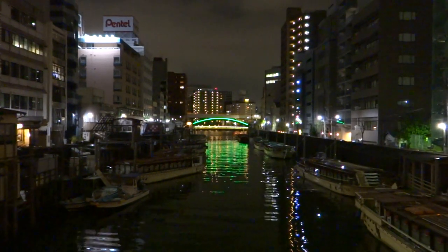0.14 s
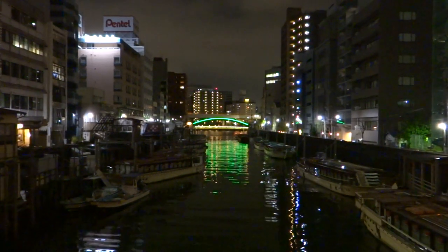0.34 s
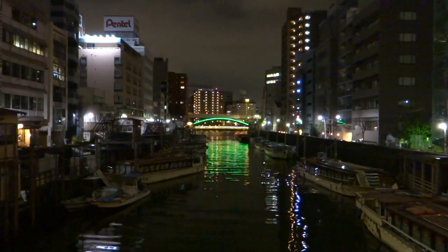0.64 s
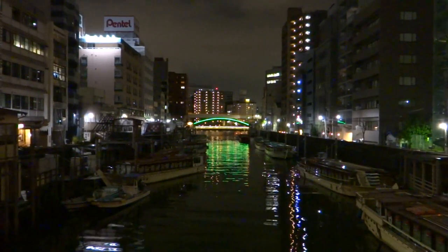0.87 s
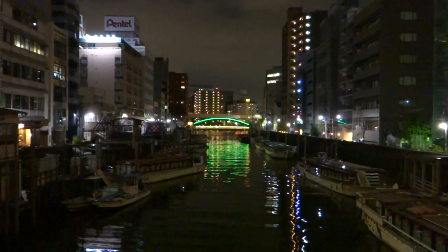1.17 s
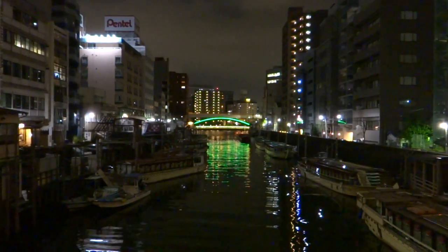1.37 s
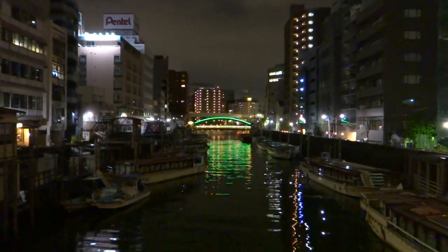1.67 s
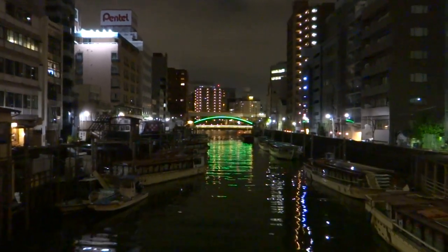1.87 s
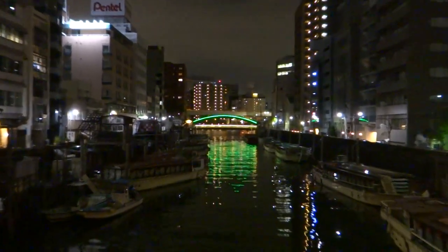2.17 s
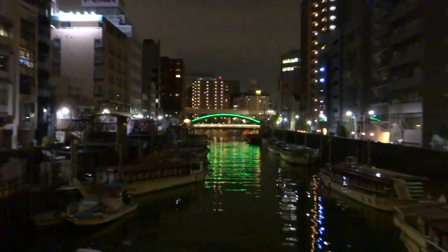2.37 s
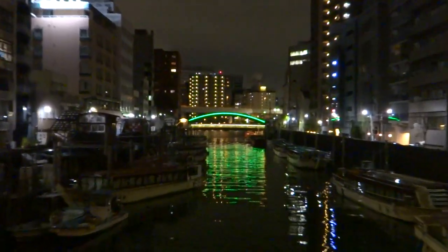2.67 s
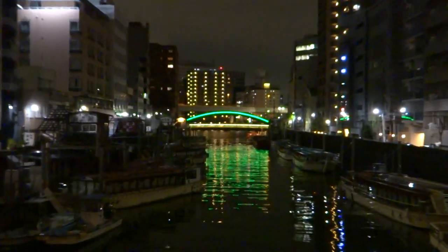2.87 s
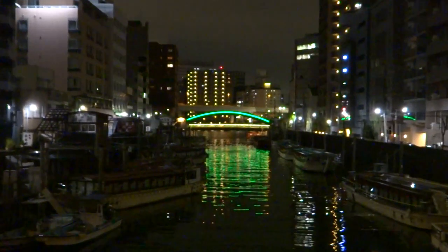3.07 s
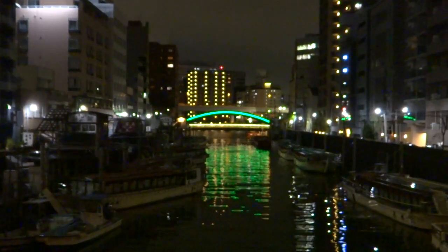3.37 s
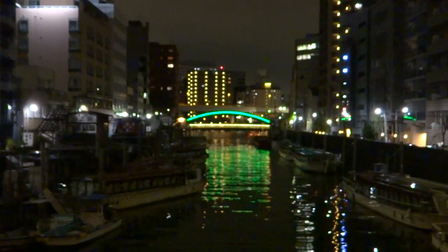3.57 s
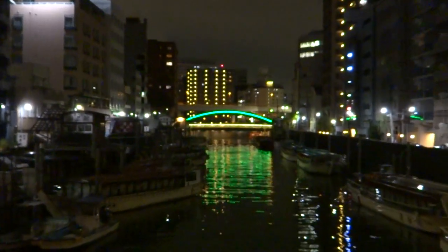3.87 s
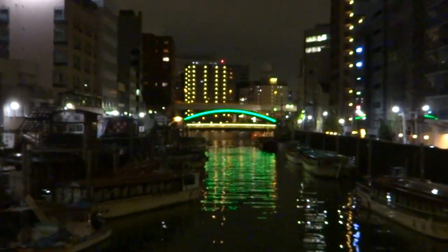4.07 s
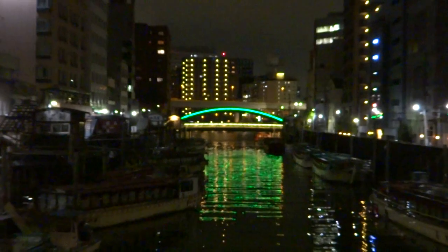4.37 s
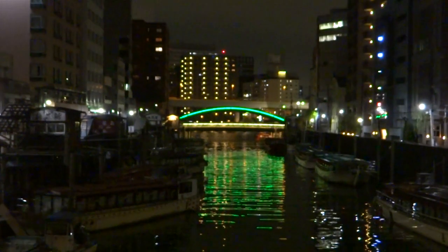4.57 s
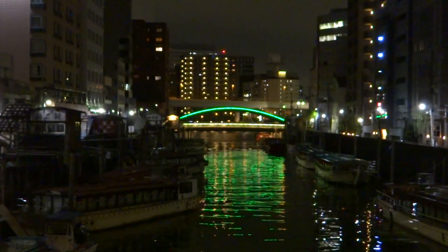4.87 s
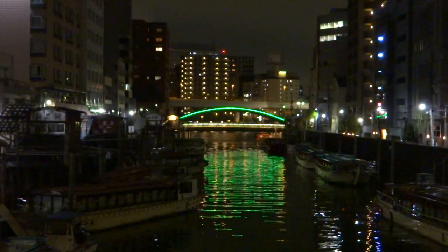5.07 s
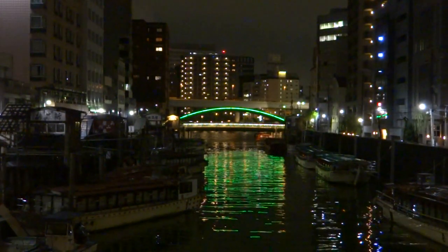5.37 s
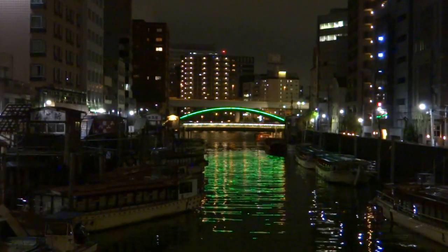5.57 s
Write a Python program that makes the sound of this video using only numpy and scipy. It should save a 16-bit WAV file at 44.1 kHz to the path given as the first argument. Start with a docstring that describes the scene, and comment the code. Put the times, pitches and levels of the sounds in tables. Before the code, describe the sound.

A steady distant traffic wash fills the open air, with a very faint high electrical whine. A heavy vehicle pulls away on the right, its deep engine note rising, sagging and rising again higher. One tiny tick sounds nearby at the microphone. Rough gas roar and tyre noise swell, and the boom eases as the tyres stay loud.

```python
"""Night traffic on a city bridge

A heavy engine idles, revs up, eases off for a gear change and pulls away close on the right. Its exhaust booms
as a sum of firing orders; noise pulsed by the firings makes gas roar and clatter with tyres. Wheel thuds are
decaying low sines, and one nearby tick is a short burst of ringing modes. Behind lie far traffic as two bands
of ebbing noise, a faint whine of wavering sines and a very high hiss."""
import sys
import numpy as np
from scipy import signal
from scipy.fft import rfft, irfft
from scipy.io import wavfile
from scipy.ndimage import uniform_filter1d

SR = 44100
rng = np.random.default_rng(int(sys.argv[2]) if len(sys.argv) > 2 else 0)


def persist_wave(psi):
    """Save psi, clipped to +-1, as 16-bit WAV."""
    counts = np.round(np.clip(psi, -1, 1) * 32767).astype(np.int16)
    wavfile.write(sys.argv[1], SR, np.atleast_2d(counts).T)


N = 252252
TIME = np.arange(N) / SR  # s


def from_db(db):
    """Decibels to gain."""
    return 10 ** (np.asarray(db) / 20)


def unit(x):
    """Scales to an rms of one."""
    return x / np.sqrt(np.mean(x ** 2) + 1e-20)


def follow(rows):
    """The columns of a curve table at every sample, without the time column."""
    seconds, *columns = np.transpose(rows)
    return [np.interp(TIME, seconds, column) for column in columns]


def at_hz(points, hz):
    """Reads a spectrum on a log-frequency axis."""
    f, value = np.transpose(points)
    return np.interp(np.log(hz + 1), np.log(f + 1), value)


def drift(top_hz):
    """A slow random wander of rms one: white noise under a Gaussian low-pass."""
    hz = np.fft.rfftfreq(N, 1 / SR)
    spectrum = rfft(rng.standard_normal(N)) * np.exp(-(hz / top_hz) ** 2)
    return unit(irfft(spectrum, N))


def noise(spectrum, likeness, patchy_db):
    """Partly alike stereo noise of a given colour and rms one, with patches that come and go."""
    size, hop = 4096, 1024  # samples
    hz = np.fft.rfftfreq(size, 1 / SR)
    a, b, c, d, patches = rng.standard_normal((5, N // hop + 5, len(hz)))
    # smoothing over time, then over frequency, turns grains into patches
    patches = uniform_filter1d(patches, size=4, axis=0)
    patches = unit(uniform_filter1d(patches, size=40, axis=1))
    same = np.clip(at_hz(likeness, hz), -1, 1)
    left = a + 1j * b
    right = same * left + np.sqrt(1 - same ** 2) * (c + 1j * d)
    frames = np.array([left, right]) * from_db(at_hz(spectrum, hz) + patchy_db * patches)
    sound = signal.istft(frames.swapaxes(1, 2), nperseg=size, noverlap=size - hop)[1]
    return unit(sound[:, :N])


def placed(x, balance_db):
    """Tilts a sound between left and right, keeping the mean of the two gains at one."""
    gains = from_db(np.array([balance_db, -balance_db]) / 2)
    return x * gains / gains.mean(0)


# colour of the far rumble: (frequency [Hz], relative density [dB per Hz])
RUMBLE_COLOUR = [(12, -22), (25, -12), (45, -4), (80, 1), (170, 3.5), (230, -4.5), (370, -6), (520, -10),
                 (900, -17.5), (1200, -54)]
# colour of the far tyre hiss: (frequency [Hz], relative density [dB per Hz])
HISS_COLOUR = [(410, -25), (700, -6.5), (798, -1.5), (886, -5.5), (997, -1.5), (1770, -10), (2080, -6),
               (2920, -14.5), (3160, -13.5), (6070, -21.5), (6740, -21.5), (9350, -23.5), (11200, -30),
               (12300, -35), (16000, -46)]
# how the distant traffic ebbs: (time [s], level change [dB])
TRAFFIC_EBB = [(0, 2.5), (.8, 4), (1.5, 2), (2.2, 2), (2.9, 1), (4, 1), (5.72, -0.5)]
# how alike the distance sounds at left and right: (frequency [Hz], coherence [0 to 1])
CITY_LIKENESS = [(60, 1.0), (130, 1.0), (290, 0.99), (640, 0.92), (1410, 0.68), (3100, 0.9), (6820, 0.91),
                 (15000, 0.94)]


def city():
    """Far traffic: a low rumble and a smooth tyre hiss that ebb together."""
    ebb_db, = follow(TRAFFIC_EBB)
    rumble = from_db(-36) * noise(RUMBLE_COLOUR, CITY_LIKENESS, patchy_db=0.0)
    hiss_db = -45.5 + 0.35 * drift(27)
    hiss = from_db(hiss_db) * noise(HISS_COLOUR, CITY_LIKENESS, patchy_db=0.65)
    hiss = hiss * from_db([[-.4], [.4]])  # a touch more on the right
    return from_db(ebb_db) * (rumble + hiss)


# a thin electrical whine: (frequency [Hz], mean level [dB])
WHINE_TONES = [(5222, -74), (6476, -80), (6961, -76), (9862, -86), (11601, -82)]


def whine(waver_hz, flicker_db):
    """Faint high electrical tones, each a sine that wavers in pitch and level."""
    out = np.zeros(N)
    for hz, db in WHINE_TONES:
        level = from_db(db + flicker_db * drift(3))
        cycles = np.cumsum(hz + waver_hz * drift(12)) / SR
        out += level * np.sin(2 * np.pi * cycles)
    return out


# colour of the very high sizzle: (frequency [Hz], relative density [dB per Hz])
SIZZLE_COLOUR = [(11000, -41), (13000, -7), (14000, -1), (15000, 4), (16000, -13)]
# how strong the sizzle is: (time [s], level [dB])
SIZZLE_STRENGTH = [(0, -95), (3.8, -87), (4.1, -72), (4.55, -66), (4.9, -72), (5.72, -69)]


def sizzle():
    """A thin hiss at the very top: one band of noise, alike on both sides."""
    level_db, = follow(SIZZLE_STRENGTH)
    return from_db(level_db) * noise(SIZZLE_COLOUR, CITY_LIKENESS, patchy_db=-1.0)[0]


# one faint tick nearby: (time [s], strike level [dB])
TICK_STRIKES = [(2.817, -30)]
# what it rings with: (frequency [Hz], relative level [dB], time to fall 60 dB [s])
TICK_RING = [(2830, -5, .016), (4980, -4, .01), (5400, -1, .011), (13900, -15, .01)]


def ticks():
    """A small hard part is nudged and rings in a few modes for some milliseconds."""
    out = np.zeros(N)
    for start_s, strike_db in TICK_STRIKES:
        t = np.maximum(TIME - start_s, 0)
        ring = np.zeros(N)
        for hz, db, t60 in TICK_RING:
            ring += from_db(db - 60 * t / t60) * np.sin(2 * np.pi * hz * t)
        onset = np.tanh(t / .0008)
        out += from_db(strike_db) * onset * ring
    return out


# wheels crossing bumps in the road: (time [s], level before onset, decay and side tilt [dB])
WHEEL_THUDS = [(4.69, -25), (5.62, -26)]


def thuds(deck_hz, t60):
    """The road deck gives a short low shudder, a decaying sine, stronger on the right."""
    out = np.zeros(N)
    for start_s, thud_db in WHEEL_THUDS:
        t = np.maximum(TIME - start_s, 0)
        onset = np.tanh(t / .015)
        out += from_db(thud_db - 60 * t / t60) * onset * np.sin(2 * np.pi * deck_hz * t)
    return out * from_db([[-2.5], [2.5]])


# the engine revs up, eases off for a gear change and pulls again: (time [s], firing rate [Hz])
FIRING_RATE = [(2.271, 32.52), (2.45, 46.43), (2.73, 64.5), (2.97, 68.56), (3.2, 62.04), (3.45, 60.18),
               (3.62, 56.62), (3.95, 59.23), (4.17, 59.57), (4.42, 70.3), (4.6, 75), (4.76, 82.12),
               (5.04, 89.3), (5.2, 91.5), (5.58, 91.2), (5.72, 86.5)]
IDLE_HZ, PULL_AWAY_S = 28.4, 2.16


def engine_speed():
    """The firing rate in Hz: a steady idle until the vehicle pulls away."""
    return follow([(PULL_AWAY_S, IDLE_HZ), *FIRING_RATE])[0]


# what the silencer lets through: (frequency [Hz], gain [dB])
SILENCER = [(60, -9), (95, 5), (113, 2), (141, 5), (172, 5.5), (200, -1), (230, -9), (290, -15.5),
            (370, -13), (500, -29.5), (1100, -57)]
# weight of the lowest order against the others: (time [s], level change [dB])
LOWEST_ORDER = [(2.1, 6), (2.4, -15), (3.3, -4.5), (3.65, -5), (4.65, -7), (4.76, 2), (4.95, -9.5),
                (5.47, 6.5), (5.72, 6)]
# tilt of the orders, far and near [dB per doubling of the order number]
SLOPE_FAR_DB, SLOPE_NEAR_DB = -4.5, 0.5


def order_levels(firing_hz, boom_db, closeness, fade_db, count=12):
    """Each order swells as it sweeps through the pipe's pass band, and wavers a little among the echoes."""
    bass_db, = follow(LOWEST_ORDER)
    # the note brightens as the vehicle nears
    slope_db = SLOPE_FAR_DB + (SLOPE_NEAR_DB - SLOPE_FAR_DB) * closeness
    levels = []
    for k in range(1, count + 1):
        order_db = boom_db + at_hz(SILENCER, k * firing_hz) + slope_db * np.log2(k / 2)
        levels.append(order_db + (k == 1) * bass_db + fade_db * drift(8.2))
    return levels


def exhaust(firings, firing_hz, order_db, uneven, lope, facade_db, ring_hz=130, ring_width_hz=120, flutter=0.14):
    """One pressure pulse a firing, as a sum of orders; no two firings are equally strong."""
    rev_rise = firing_hz / firing_hz.min() - 1
    pulses = 0
    for k, db in enumerate(order_db, 1):
        # the pipe's resonance holds back the orders near it, so each pulse rings on
        lag = 2 * np.arctan(2 * (k * firing_hz - ring_hz) / ring_width_hz)
        # once the vehicle moves, shifting echoes smear each order, the high ones most
        smear = flutter * (k * firing_hz / ring_hz) ** 1.47 * np.tanh(rev_rise) * drift(22)
        pulses = pulses + from_db(db) * np.exp(1j * (2 * np.pi * k * firings - lag + smear))
    number = np.arange(int(firings[-1]) + 2)
    # random unevenness, plus a lope: every second firing is stronger
    strength = 1 + uneven * rng.standard_normal(len(number)) + lope * np.cos(np.pi * number)
    pulses = np.sqrt(2) * pulses * np.interp(firings, number, strength)
    # reflections from the buildings reach the two sides with a wandering phase
    wander = (drift(9.7) + 1j * drift(3.7)) / np.sqrt(2)
    side = from_db(facade_db) * pulses * wander
    return pulses.real, side.real


def firing_gate(cycles, depth):
    """Swells once per cycle, with a mean power of one."""
    return unit(np.exp(depth * np.cos(2 * np.pi * cycles)))


# colour of the turbulent exhaust gas from afar: (frequency [Hz], relative density [dB per Hz])
ROAR_FAR_COLOUR = [(20, -30), (45, -22), (75, 1.5), (150, 7.5), (210, 6.5), (290, -5.5), (370, -6),
                   (500, -8.5), (700, -33), (1400, -65)]
# colour of the same gas close to the microphone: (frequency [Hz], relative density [dB per Hz])
ROAR_NEAR_COLOUR = [(20, -35), (45, -13), (75, -4), (150, 4.5), (210, 2.5), (290, -3.5), (370, -3),
                    (500, -8.5), (700, -21.5), (1400, -27.5), (4000, -64.5)]
# the roar's level when boom and approach both peak [dB], and its change with each [dB per dB]
ROAR_PEAK_DB, ROAR_PER_BOOM, ROAR_PER_APPROACH = -22, 0.29, 0.71
# how alike the vehicle's noises are at left and right: (frequency [Hz], coherence [0 to 1])
VEHICLE_LIKENESS = [(60, 1), (130, 0.92), (290, 0.79), (640, 0.64), (1410, 1), (3100, 0.9), (15000, 0.55)]


def gas_roar(firings, boom_db, clatter_db, off_axis):
    """Turbulent exhaust gas: noise pulsed by the firings, opening up as the vehicle comes near."""
    near = np.clip((clatter_db + 42) / 7, 0, 1)
    far_roar = np.sqrt(1 - near) * noise(ROAR_FAR_COLOUR, VEHICLE_LIKENESS, patchy_db=0.66)
    near_roar = np.sqrt(near) * noise(ROAR_NEAR_COLOUR, VEHICLE_LIKENESS, patchy_db=1.0)
    boom_part_db = ROAR_PER_BOOM * (boom_db - boom_db.max())
    approach_part_db = ROAR_PER_APPROACH * (clatter_db - clatter_db.max())
    level = from_db(ROAR_PEAK_DB + boom_part_db + approach_part_db)
    roar = level * (far_roar + near_roar) * firing_gate(firings, depth=0.2)
    # straight ahead, the roar reaches both sides alike
    middle = roar.mean(0)
    return middle + off_axis * (roar - middle)


# colour of engine clatter and tyres: (frequency [Hz], relative density [dB per Hz])
CLATTER_COLOUR = [(100, 0.5), (400, -5), (700, -0.5), (1100, -0.5), (2100, -3.5), (2500, -10), (3600, -9.5),
                  (4500, -14.5), (5400, -14.5), (6200, -22.5), (7500, -20), (9500, -28), (12000, -54),
                  (15500, -46)]


def engine_clatter(firings, clatter_db):
    """Mechanical knocks and tyre noise: noise that swells slightly with each firing."""
    clatter = from_db(clatter_db) * noise(CLATTER_COLOUR, VEHICLE_LIKENESS, patchy_db=0.75)
    # every second cylinder knocks a little harder
    knocks = firing_gate(firings, depth=0.1) * firing_gate(firings / 2, depth=0.066)
    return clatter * knocks * from_db(0.31 * drift(27))


# how hard the exhaust booms, before silencer and order tilt: (time [s], level [dB])
BOOM_DRIVE = [(2.12, -45), (2.24, -33.5), (2.48, -28), (2.75, -32), (3.24, -28), (3.46, -31.5), (3.62, -25),
              (3.95, -33), (4.3, -30), (4.5, -33.5), (4.61, -27), (5.02, -23.5), (5.11, -25.5), (5.19, -21),
              (5.3, -27.5), (5.52, -34), (5.72, -37.5)]
# clatter and tyres grow as the vehicle nears: (time [s], level [dB])
CLATTER_APPROACH = [(1.5, -50.5), (2.9, -45.8), (3.5, -41), (4, -42.5), (4.42, -39), (4.6, -35.5),
                    (4.95, -36), (5.3, -34), (5.72, -34)]
# where the vehicle stands, as heard in its boom: (time [s], left minus right [dB])
VEHICLE_BEARING = [(2.25, -0.5), (2.65, -9), (3.2, -5.5), (3.7, -5.5), (4.1, -8.5), (4.7, -6.5), (5.2, -7),
                   (5.72, -5)]


def vehicle():
    """Exhaust boom, gas roar and clatter, all timed by the same firings."""
    firing_hz = engine_speed()
    firings = np.cumsum(firing_hz) / SR  # running count
    boom_db, = follow(BOOM_DRIVE)
    clatter_db, = follow(CLATTER_APPROACH)
    balance_db, = follow(VEHICLE_BEARING)
    closeness = (clatter_db - clatter_db.min()) / np.ptp(clatter_db)
    off_axis = np.tanh(abs(balance_db) / 4)
    order_db = order_levels(firing_hz, boom_db, closeness, fade_db=1.98)
    boom, side = exhaust(firings, firing_hz, order_db, uneven=0.097, lope=0.036, facade_db=-25)
    boom = np.array([boom + off_axis * side, boom - off_axis * side])
    roar = gas_roar(firings, boom_db, clatter_db, off_axis)
    clatter = engine_clatter(firings, clatter_db)
    # roar and clatter lean further to the side than the boom
    return placed(boom, balance_db) + placed(roar, 1.57 * balance_db) + placed(clatter, 1.16 * balance_db)


def scene():
    """The vehicle in front of the city."""
    background = city() + whine(waver_hz=3.3, flicker_db=1.5) + sizzle()
    return background + ticks() + thuds(deck_hz=42, t60=.3) + vehicle()


def record(dry):
    """The recorder's band limit: a steep low-pass at 15.8 kHz."""
    low_pass = signal.firwin(511, 15800, window=("kaiser", 9), fs=SR)
    return signal.oaconvolve(dry, low_pass[None], "same")


dry = scene()
out = record(dry)
persist_wave(out)
```